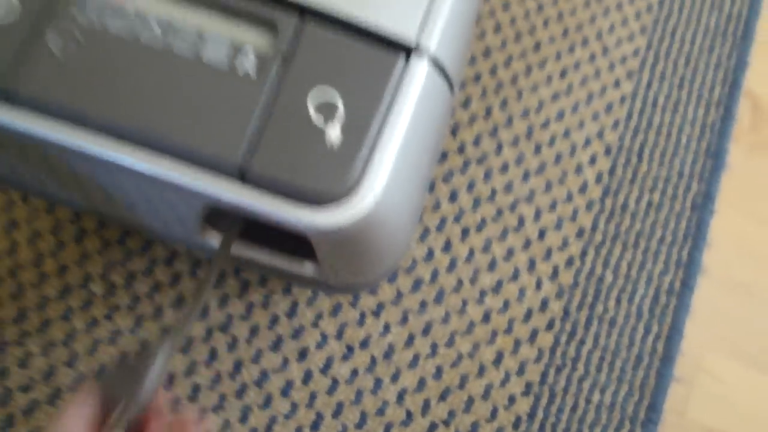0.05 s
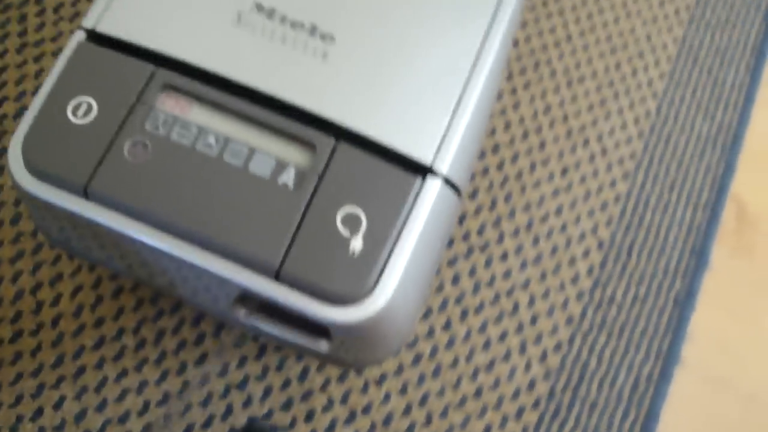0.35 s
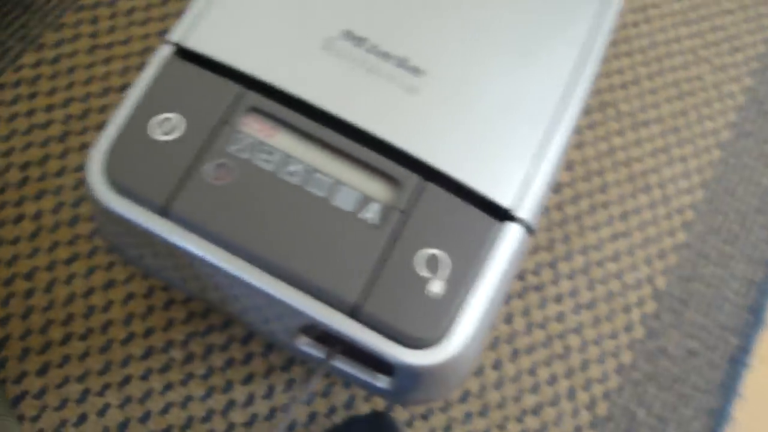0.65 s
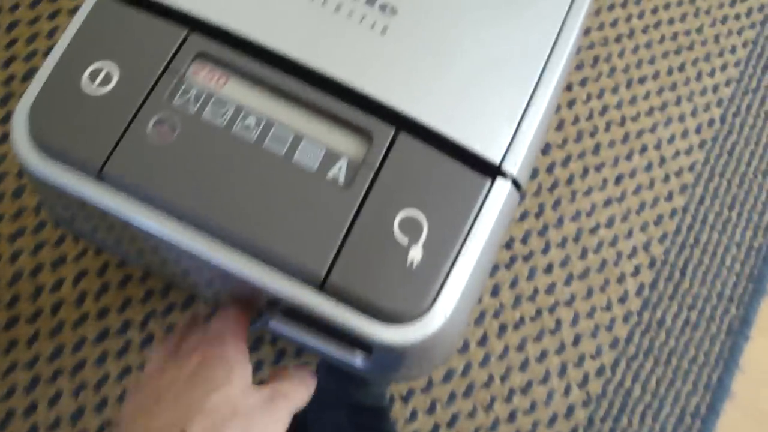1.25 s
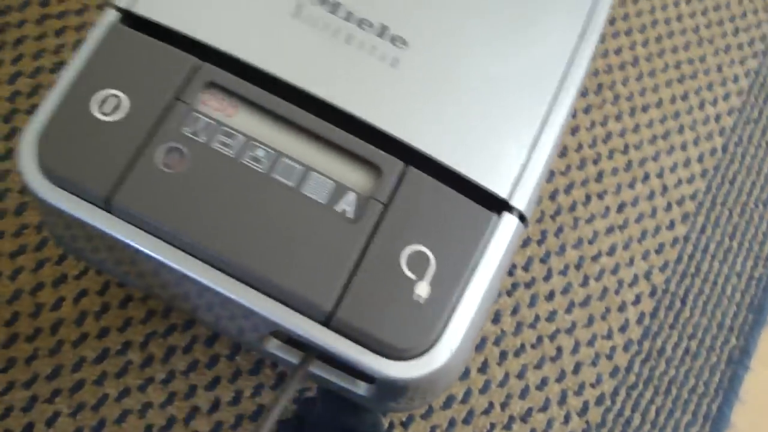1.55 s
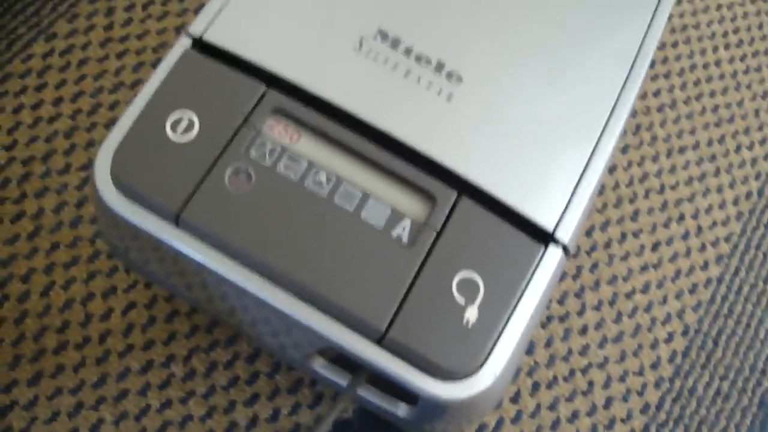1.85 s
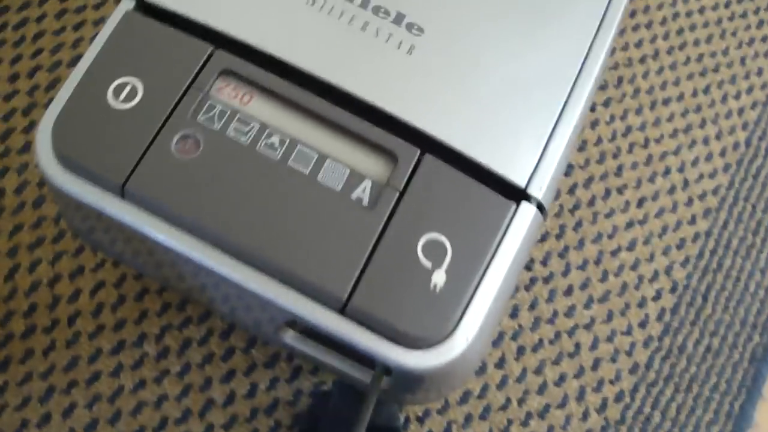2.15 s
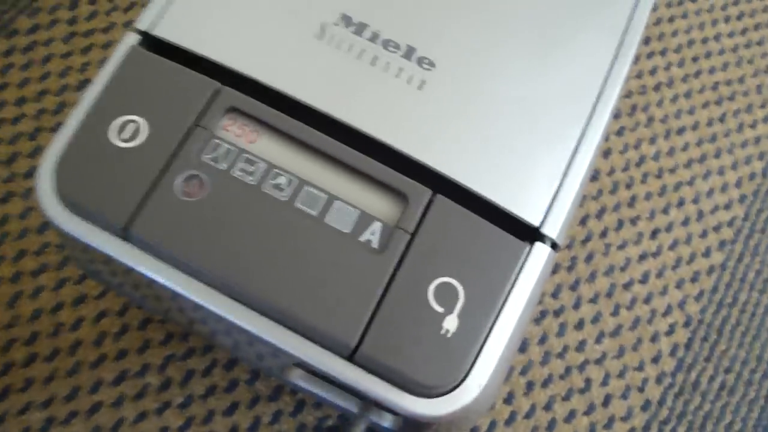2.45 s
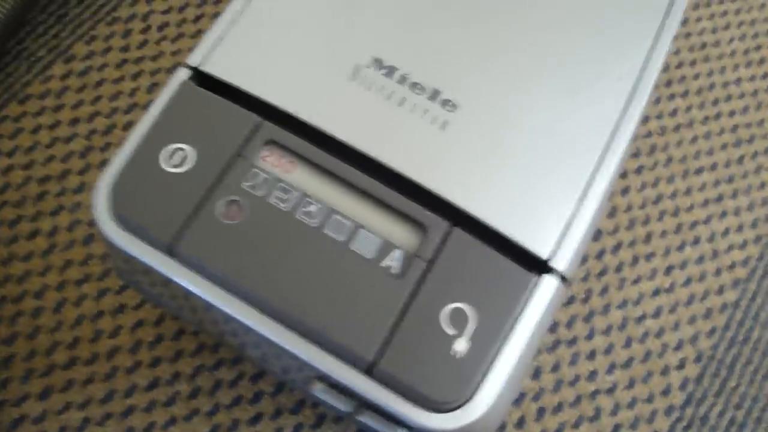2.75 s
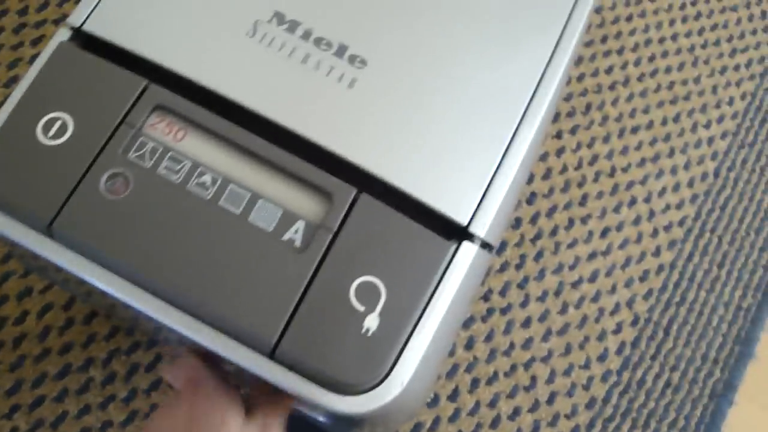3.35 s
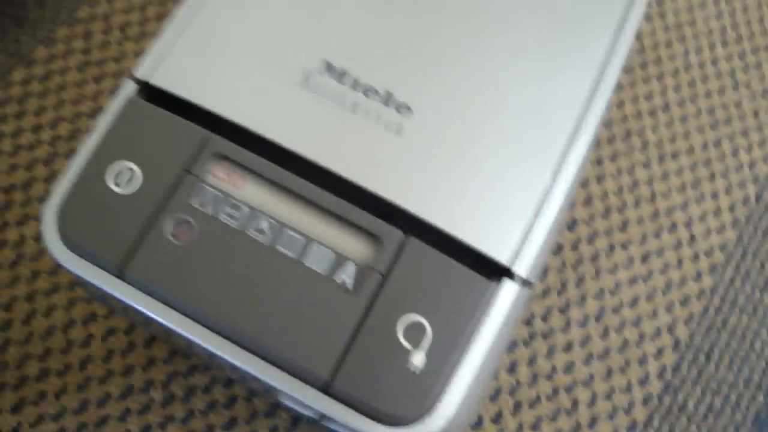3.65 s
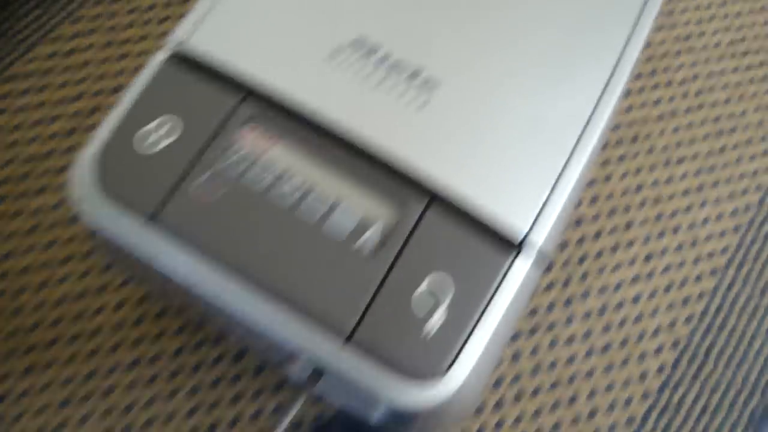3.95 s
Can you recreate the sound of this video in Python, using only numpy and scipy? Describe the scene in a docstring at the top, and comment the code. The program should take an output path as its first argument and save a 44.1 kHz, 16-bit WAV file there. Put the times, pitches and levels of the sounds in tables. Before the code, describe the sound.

A power cord rasps out of a vacuum cleaner in four pulls, with knocks between.

```python
"""A power cord is hauled out of a vacuum cleaner in a carpeted room. The first, longest pull rasps
and snags over the outlet while the reel rattles the plastic casing. The reel cracks against its catch,
ducked by a limiter; cord and plug click, then thud on the carpet. Two shorter pulls follow, each
with a brief stick-slip squeal, then lighter knocks and clicks. More thuds lead into a fourth pull."""
import sys
import numpy as np
from scipy import signal
from scipy.fft import rfft, irfft
from scipy.io import wavfile
from scipy.ndimage import map_coordinates

SR = 44100
rng = np.random.default_rng(int(sys.argv[2]) if len(sys.argv) > 2 else 0)


def wav_out(sig):
    """Save sig, one row per channel (or a flat mono array), as 16-bit PCM at SR to the path in sys.argv[1]."""
    wavfile.write(sys.argv[1], SR, np.round(np.clip(np.atleast_2d(sig).T, -1, 1) * 32767).astype(np.int16))


N = 176400
T = np.arange(N) / SR
EVENT_T = T[:SR // 4]


def amp(db):
    """Decibels to gain."""
    return 10 ** (np.asarray(db) / 20)


def unit_rms(x):
    """Scales to rms 1."""
    return x / np.sqrt(np.mean(x ** 2) + 1e-20)


def curve_at(points, hz):
    """Interpolates a table on a log-frequency axis."""
    point_hz, value = np.transpose(points)
    return np.interp(np.log(hz + 1), np.log(point_hz), value)


def add(mix, start_s, sound):
    """Mixes a sound in at start_s."""
    part = mix[max(round(start_s * SR), 0):][:len(sound)]
    part += sound[:len(part)]


def colour(x, spectrum, tilt_db_per_oct=0, size=4096):
    """Minimum-phase filter of unit energy with the given spectrum, tilted above 500 Hz."""
    hz = abs(np.fft.fftfreq(size, 1 / SR))
    log_gain = np.log(amp(curve_at(spectrum, hz) + tilt_db_per_oct * np.log2(np.maximum(hz, 500))))
    response = np.exp(np.conj(signal.hilbert(log_gain)))
    taps = np.fft.ifft(response).real[:size // 2]
    return signal.fftconvolve(x, taps / np.linalg.norm(taps))[:len(x)]


def wobble(rate_hz=14.6):
    """Slow random motion of rms 1."""
    hz = np.fft.rfftfreq(N, 1 / SR)
    spectrum = rfft(rng.standard_normal(N)) * hz / (hz + 10) / (1 + (hz / rate_hz) ** 2)
    return unit_rms(irfft(spectrum, N))


def bump(centre_s, length_s):
    """Gaussian envelope of peak 1."""
    return np.exp(-(2 * (T - centre_s) / length_s) ** 2)


# Room tone spectrum: freq_hz, gain_db
ROOM_TONE_SPECTRUM = [(25, -30), (90, 22.5), (280, 6.5), (1000, 7.5), (2000, 5.5), (5000, -1),
                      (11000, -7.5)]

def room_tone():
    """Steady, bass-heavy background noise."""
    return amp(-48.5) * colour(rng.standard_normal(N), ROOM_TONE_SPECTRUM)


# Room decay: freq_hz, t60_s
ROOM_DECAY = [(100, 0.52), (300, 0.39), (1000, 0.49), (3000, 0.36), (10000, 0.27)]

def room(x, delay_s=0.0025, early_db=0.5, early_s=0.0089, sway_hz=1.3):
    """Sparse reflections that die sooner in the treble and shift as the microphone moves."""
    out, t = np.zeros(N), T[:SR]
    for position in range(4):
        taps = rng.choice([-1., 1.], SR) * (rng.random(SR) < .1) * (t > delay_s)
        taps *= 1 + amp(early_db) * np.exp(-t / early_s)
        hz, frame_s, frames = signal.stft(taps, SR, nperseg=256)
        decay = amp(-60 * frame_s / curve_at(ROOM_DECAY, hz)[:, None])
        tail = signal.istft(frames * decay, SR, nperseg=256)[1]
        crossfade = np.maximum(np.cos(2 * np.pi * (sway_hz * T - position / 4)), 0)
        out += signal.fftconvolve(x * crossfade, tail / np.linalg.norm(tail))[:N]
    return out


def ring(modes, pitch=1):
    """One decaying sine per mode; pitch multiplies the frequencies."""
    return sum(amp(db - 60 * EVENT_T / t60_s) * np.sin(2 * np.pi * freq * pitch * EVENT_T)
               for freq, db, t60_s in modes)


# Modes of a soft blow: pitch_ratio, level_db, t60_s
SOFT_MODES = [(1, 0, 0.046), (1.4, 3.5, 0.022), (1.9, -10, 0.05)]

def thud(pitch_hz, rise_s=0.0036):
    """A soft blow with a low, short ring."""
    return ring(SOFT_MODES, pitch_hz) * (1 - np.exp(-EVENT_T / rise_s))


# Landings: start_s, level_db, pitch_hz
CARPET_THUDS = [(1.14, -13, 286), (1.142, -18, 111), (1.252, -23.5, 282), (3.253, -27.5, 288),
                (3.2927, -9, 269)]

def carpet_thuds():
    """Slack cord and plug land on the carpet."""
    out = np.zeros(N)
    for start_s, level_db, pitch_hz in CARPET_THUDS:
        add(out, start_s, amp(level_db) * thud(pitch_hz))
    return out


# Crack of the hardest reel knock, then cord and plug clicks:
# start_s, level_db, chatter_s, tilt_db_per_oct, ping_db
CRACK_AND_CLICKS = [(0.9411, -3, 0.00045, -2.5, -9), (1.012, -30, .003, -1.5, -7),
                    (1.0926, -23.5, 0.0036, -2.5, 4.5), (1.250, -37.5, 0.0032, 1.5, -33),
                    (1.3237, -35, 0.0031, -1.5, 3), (1.3867, -26, 0.003, -2.5, -0.5),
                    (1.4871, -29.5, 0.0028, -1.5, 2.5), (2.109, -22.5, 0.0031, -4, -14),
                    (2.289, -24.5, 0.0053, -3, -10), (2.314, -23, 0.0035, 0, -39),
                    (2.4323, -26, 0.0012, -3.5, -17), (2.4619, -19.5, 0.0019, -2.5, -31),
                    (2.914, -26, 0.0043, -2, 8), (2.979, -35.5, 0.0021, -4.5, 1),
                    (3.061, -23.5, 0.0041, -3, -9), (3.2886, -25, 0.0048, -0.5, -35),
                    (3.4088, -40, 0.0033, 0, -15), (3.433, -30, 0.0033, -2, -6),
                    (3.482, -39, 0.0037, -0.5, -15)]
# Chatter spectrum: freq_hz, gain_db
CLICK_SPECTRUM = [(60, -19), (300, -6), (700, 2), (1600, 1.5), (2600, -3), (3200, -3), (4500, -7),
                  (5500, -7), (7500, -15), (11000, -19)]

def crack_and_clicks(ping_hz=3106, ping_t60_s=0.023):
    """One sharp crack, then hard plastic chattering for milliseconds; returns chatter and pings."""
    chatter, pings = np.zeros(N), np.zeros(N)
    ping = amp(3) * ring([(ping_hz, 0, ping_t60_s)])
    for start_s, level_db, chatter_s, tilt_db_per_oct, ping_db in CRACK_AND_CLICKS:
        age = EVENT_T / chatter_s
        burst = rng.standard_normal(len(age)) * np.sqrt(age) * np.exp(1 - age)
        add(chatter, start_s, amp(level_db) * colour(burst, CLICK_SPECTRUM, tilt_db_per_oct))
        add(pings, start_s, amp(level_db + ping_db) * ping)
    return chatter, pings


# Blows on the catch: start_s, level_db, pitch_hz, thump_db, rattle_db, rattle_decay_s
REEL_KNOCKS = [(0.9413, 26, 710, -38, -36, 0.041), (2.016, 3.5, 1130, -16.5, -32, 0.032),
               (2.2188, -5.5, 814, -9.5, -23.5, 0.024), (3.0255, 10, 990, -22, -33, 0.004),
               (3.064, -3.5, 606, -34, -20, 0.0087), (3.1383, 3.5, 910, -37, -27.5, 0.029)]
# Clack spectrum: pitch_ratio, gain_db
CLACK_SPECTRUM = [(.1, -31), (.3, -2), (.6, 2.5), (1.35, 4.5), (1.9, -6.5), (2.8, -14.5), (4.2, -25),
                  (12, -82)]

def reel_knocks(thump_hz=271):
    """The reel hits its catch: a damped clack, a brief rattle and a thump."""
    out, impulse = np.zeros(N), EVENT_T == 0
    for start_s, level_db, pitch_hz, thump_db, rattle_db, rattle_decay_s in REEL_KNOCKS:
        rattle = amp(rattle_db) * rng.standard_normal(len(EVENT_T)) * np.exp(-EVENT_T / rattle_decay_s)
        clack = colour(impulse + rattle, [(ratio * pitch_hz, db) for ratio, db in CLACK_SPECTRUM])
        add(out, start_s, amp(level_db) * (clack + amp(thump_db) * thud(thump_hz)))
    return out


# Squeals on the outlet: centre_s, length_s, pitch_hz, level_db
CORD_SQUEALS = [(1.837, 0.028, 1826, -19), (2.663, 0.0044, 3080, -7.5)]

def cord_squeals():
    """The cord sticks and slips at one pitch for a moment."""
    return sum(amp(level_db) * bump(centre_s, length_s) * np.sin(2 * np.pi * pitch_hz * T)
               for centre_s, length_s, pitch_hz, level_db in CORD_SQUEALS)


def slips(per_s, spread_db):
    """Friction: a dense train of tiny random slips, a few of them large."""
    size = amp(spread_db * np.minimum(rng.exponential(1, N), 5))
    return unit_rms(size * rng.choice([-1, 1], N) * (rng.random(N) < per_s / SR))


def drift(x, rms_share=0.01846):
    """Resonances wander in pitch as the cord shifts."""
    position = np.arange(N) + np.cumsum(rms_share * wobble())
    return map_coordinates(x, [position], order=3, mode="nearest")


# Strokes: start_s, end_s, rattle_db, speed_change_db, hiss_db, hiss_swell_db
HAND_STROKES = [(-.06, 0.695, -22, 1, -29, -3), (1.503, 1.871, -20.5, -1, -31.5, 11),
                (2.471, 2.85, -17.5, -7, -30.5, 15), (3.504, 3.884, -18.5, -4, -25.5, 9)]

def hand_strokes(rise_s=0.016, creep_s=0.047, creep_db=-18.5, uneven_db=3.36):
    """An unsteady hand eases the cord out, then hauls; returns rattle and hiss envelopes."""
    run_out_db_per_s, hiss_stop_db_per_s = 249, 410
    rattle, hiss = np.zeros(N), np.zeros(N)
    unsteadiness = amp(uneven_db * np.tanh(wobble()))
    for start_s, end_s, rattle_db, speed_change_db, hiss_db, hiss_swell_db in HAND_STROKES:
        progress = np.clip((T - start_s) / (end_s - start_s), 0, 1)
        after_s = np.maximum(T - end_s, 0)
        creep = amp(creep_db) * np.clip((T - start_s) / creep_s + 1.27, 0, 1)  # leads the haul
        haul = np.clip((T - start_s) / rise_s, 0, 1)
        motion = np.maximum(haul, creep) * unsteadiness * amp(speed_change_db * progress)
        swell_db = hiss_swell_db * np.sin(np.pi * progress)
        rattle += motion * amp(rattle_db - run_out_db_per_s * after_s)
        hiss += motion * amp(hiss_db + swell_db - hiss_stop_db_per_s * after_s)
    return rattle, hiss


# Catches on the outlet's edge: centre_s, length_s, level_db
CORD_SNAGS = [(0.022, 0.013, -16.5), (0.094, 0.0083, -22.5), (0.147, 0.015, -23.5), (0.184, 0.038, -25.5),
              (0.297, 0.015, -24.5), (.322, 0.0029, -20), (0.34, 0.026, -23), (0.431, 0.015, -22),
              (0.51, 0.042, -28.5), (0.593, 0.058, -27.5), (0.694, 0.016, -20.5), (1.543, 0.015, -24.5),
              (2.878, 0.0062, -29)]
# Cord hiss spectrum: freq_hz, gain_db
HISS_SPECTRUM = [(300, -15), (1500, 12), (3100, 5.5), (3500, 3.5), (4900, -3), (5500, 5), (6000, -4),
                 (6500, -3), (7800, -8.5), (11000, -17)]
# Casing rattle spectrum: freq_hz, gain_db
CASING_SPECTRUM = [(40, -73), (130, -23), (260, -6.5), (560, -6), (680, 3), (1000, 0.5), (1280, -2),
                   (1600, 3.5), (2200, 0), (2650, -15), (3150, -2), (3500, -26), (5500, -24), (11000, -37)]
# Casing resonances: freq_hz, level_db, t60_s
CASING_MODES = [(1079, 5.5, 0.09), (1513, 10.5, 0.056), (1742, 3, 0.071), (4067, -3.5, 0.074)]

def cord_pulls():
    """The reel rattles the casing; the cord hisses over the outlet, brighter where it snags."""
    rattle_envelope, hiss_envelope = hand_strokes()
    snags = sum(amp(level_db) * bump(centre_s, length_s) for centre_s, length_s, level_db in CORD_SNAGS)
    drive = np.hypot(rattle_envelope, amp(5) * snags) * slips(per_s=2000, spread_db=2)
    rattle = amp(-1) * colour(drive, CASING_SPECTRUM)
    modes = ring(CASING_MODES)
    ringing = amp(-9.5) * signal.fftconvolve(drive, modes / np.linalg.norm(modes))[:N]
    hiss = colour(hiss_envelope * slips(per_s=2800, spread_db=2.5), HISS_SPECTRUM)
    scrape = colour(snags * rng.standard_normal(N), HISS_SPECTRUM, tilt_db_per_oct=3.5)
    return drift(rattle + hiss + scrape) + ringing


def scene():
    """Mono mix of sources, reflections and room tone; the close pings stay dry."""
    chatter, pings = crack_and_clicks()
    cord = cord_pulls() + cord_squeals()
    knocks, thuds = reel_knocks(), carpet_thuds()
    casing_band = signal.butter(1, [440, 1270], "band", fs=SR, output="sos")
    radiated_knocks = signal.sosfilt(casing_band, knocks)
    echo = room(amp(-9) * cord + amp(-5) * radiated_knocks + amp(-5.5) * chatter + amp(-3.5) * thuds)
    return (cord + knocks + chatter + pings + thuds + echo + room_tone())[None]


def record(dry):
    """Low cut, a limiter whose brief lag lets the hardest knock overload, then a high cut."""
    low_cut_hz, high_cut_hz, ceiling = 280, 11030, .72
    threshold_db, slope, attack_s, recovery_db_per_s = -8, 0.67, 0.00021, 222
    x = signal.sosfilt(signal.butter(2, low_cut_hz, "high", fs=SR, output="sos"), dry)
    level_db = 20 * np.log10(abs(x[0]) + 1e-9)
    fall_db = T * recovery_db_per_s
    held_db = np.maximum.accumulate(level_db + fall_db) - fall_db
    over_db = np.maximum(held_db - threshold_db, 0)
    lag = np.exp(-1 / (attack_s * SR))
    duck_db = slope * signal.lfilter([1 - lag], [1, -lag], over_db)
    clipped = ceiling * np.tanh(x * amp(-duck_db) / ceiling)
    high_cut = signal.firwin(401, high_cut_hz, window=("kaiser", 8), fs=SR)
    return signal.oaconvolve(clipped, high_cut[None], "same")


dry = scene()
out = record(dry)
wav_out(out)
```